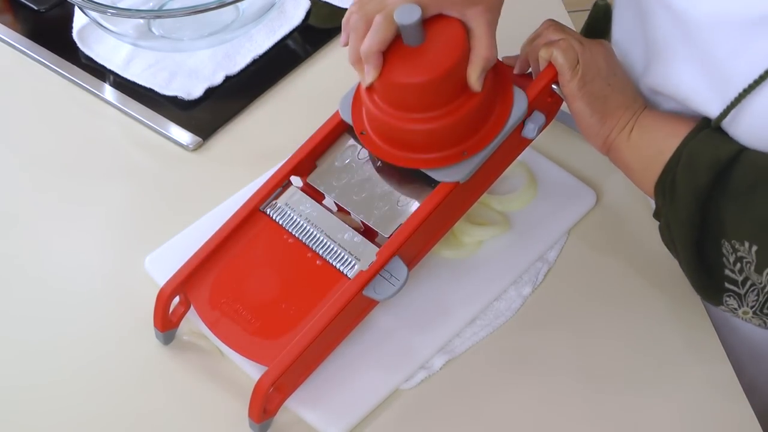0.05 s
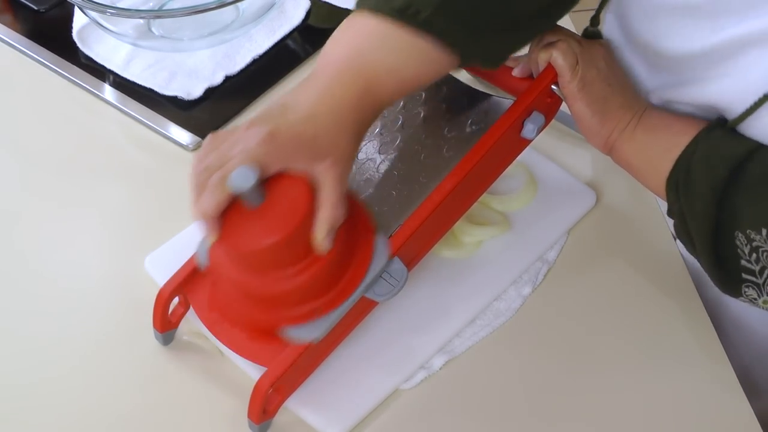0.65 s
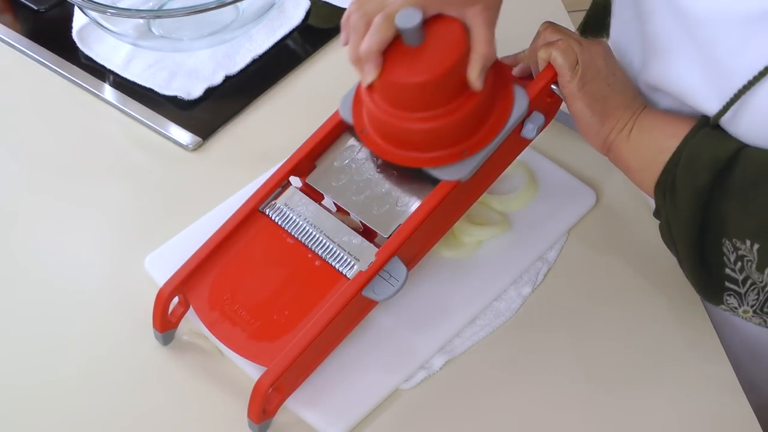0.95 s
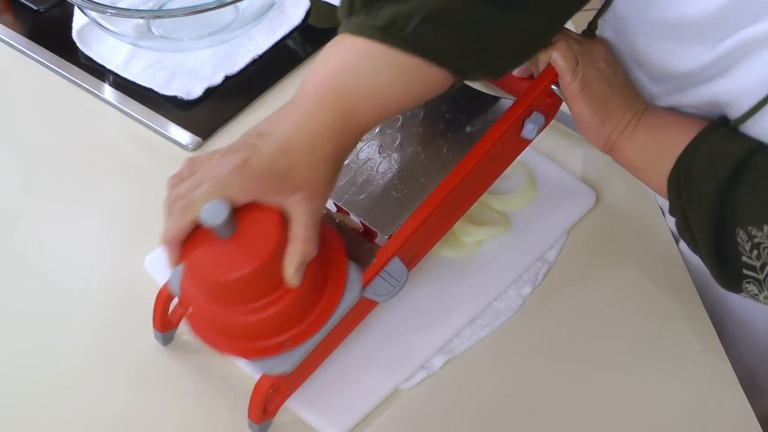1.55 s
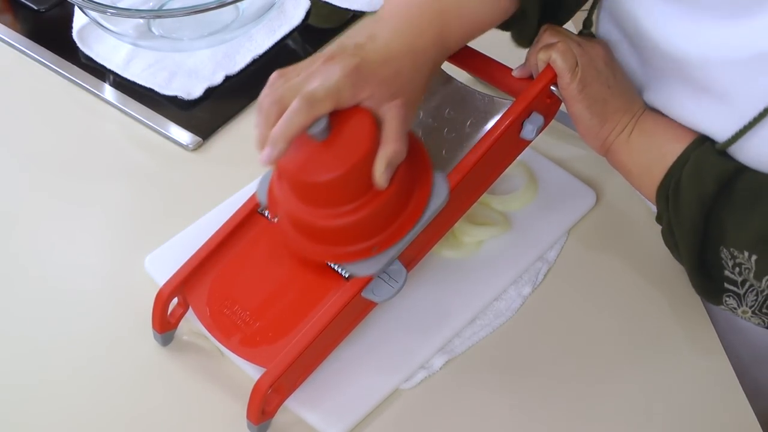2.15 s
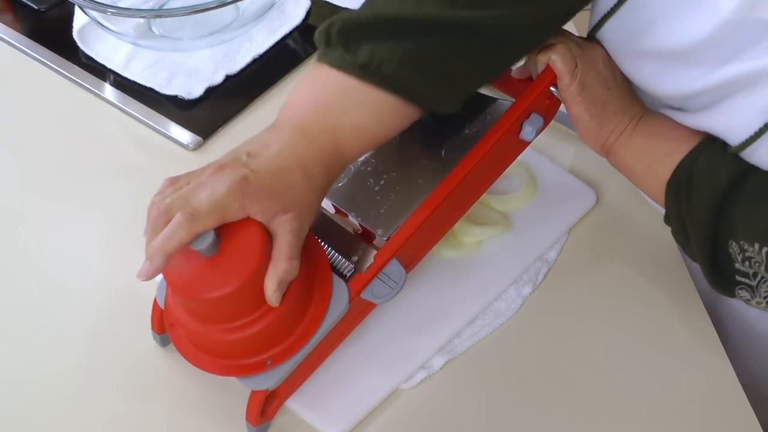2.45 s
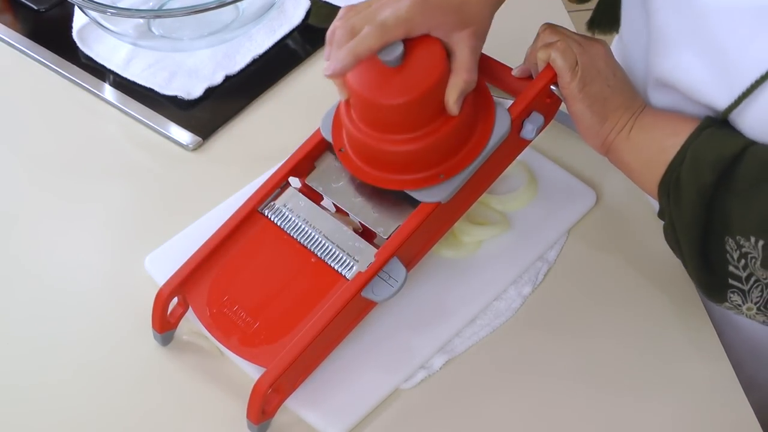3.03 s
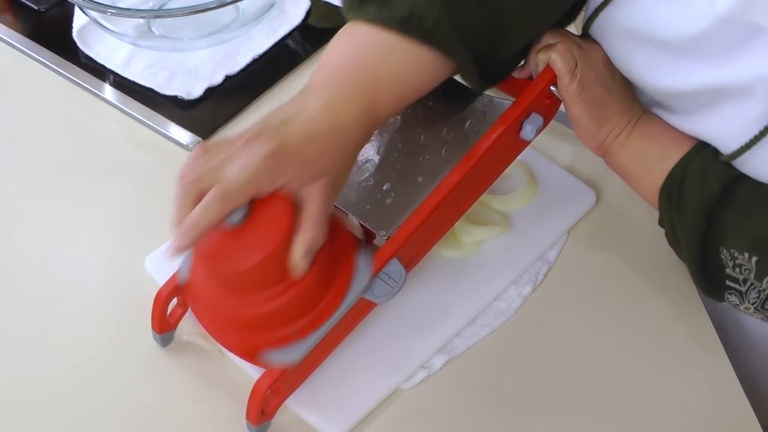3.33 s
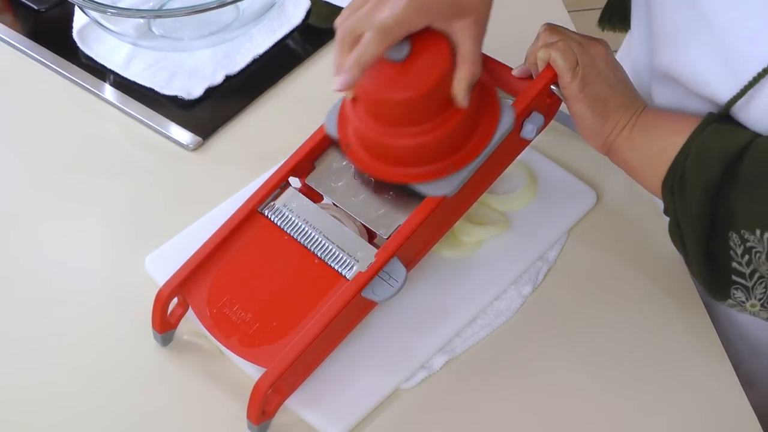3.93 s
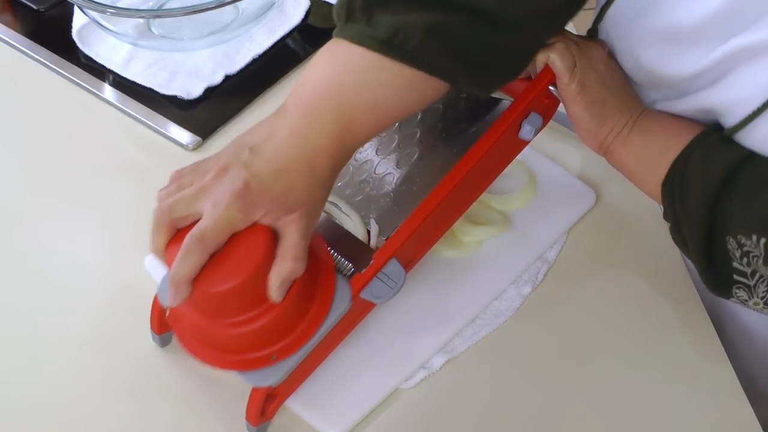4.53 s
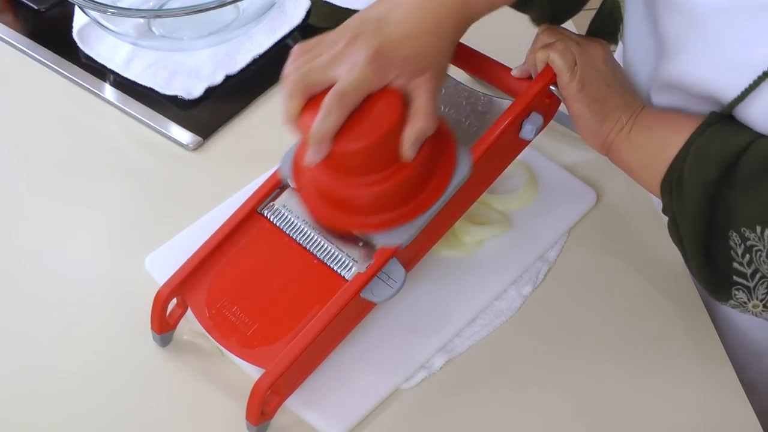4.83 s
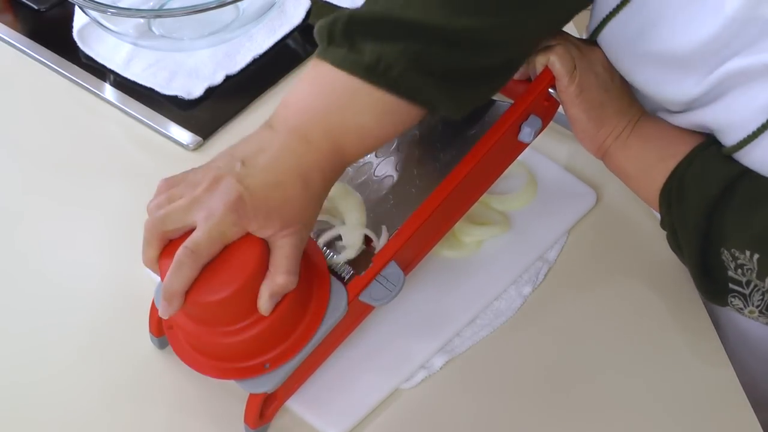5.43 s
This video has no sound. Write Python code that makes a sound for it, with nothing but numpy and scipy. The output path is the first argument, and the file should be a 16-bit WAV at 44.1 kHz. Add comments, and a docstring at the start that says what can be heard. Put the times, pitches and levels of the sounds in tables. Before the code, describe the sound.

Close to the microphone in a quiet kitchen, a plastic food holder slides back and forth on a mandoline, slicing an onion. Six even strokes each bring a wet, slightly squeaky rasp, a crisp crunch at the blades and a hollow plastic knock. Softer scrapes and light taps come between them as the holder is drawn back. The later cuts snap more sharply, over faint room noise.

```python
"""A tap and a rising wet hiss over faint room noise: an onion is pushed down a plastic mandoline.
It squeaks on the ramp, crunches through the blades as its cells burst, and the food holder knocks
against the end stop; drawn back more softly, the holder taps in its rails. Six strokes, close, in mono.
The hollow frame rumbles under the drag and rings with every blow, and the kitchen answers."""
import sys
import numpy as np
from scipy import signal
from scipy.fft import rfft, irfft
from scipy.io import wavfile
from scipy.ndimage import uniform_filter1d

SR = 44100
rng = np.random.default_rng(int(sys.argv[2]) if len(sys.argv) > 2 else 0)


def dump_mix(stems):
    """Bounce the given channels to the path in sys.argv[1] as a 16-bit WAV at rate SR."""
    frames = np.atleast_2d(stems).T  # one column per channel
    limited = np.clip(frames, -1, 1)  # hard clip at full scale
    pcm = np.round(limited * 32767).astype(np.int16)
    wavfile.write(sys.argv[1], SR, pcm)


N = 246078


def gain_of(db):
    """Decibels to amplitude."""
    return 10 ** (np.asarray(db) / 20)


def unit_rms(x):
    """Scale to rms 1."""
    return x / np.sqrt(np.mean(x ** 2) + 1e-20)


def unit_blow(x):
    """Scale the loudest 10 ms to rms 1."""
    return x / np.sqrt(uniform_filter1d(x ** 2, SR // 100).max() + 1e-20)


def lookup(table, hz):
    """Interpolate over log frequency."""
    f, value = np.transpose(table)
    return np.interp(np.log(hz + 1), np.log(f + 1), value)


def add(mix, start_s, sound):
    """Mix in at start_s."""
    part = mix[max(round(start_s * SR), 0):][:len(sound)]
    part += sound[:len(part)]


def coloured(x, spectrum, size=4096):
    """Minimum-phase filter: clicks keep their sharp front."""
    log_gain = np.log(gain_of(lookup(spectrum, abs(np.fft.fftfreq(size, 1 / SR)))))
    taps = np.fft.ifft(np.exp(np.conj(signal.hilbert(log_gain)))).real
    if np.sum(taps[:size // 2] ** 2) < np.sum(taps[size // 2:] ** 2):
        taps = np.roll(taps[::-1], 1)
    return signal.fftconvolve(x, taps[:size // 2])[:len(x)]


def wander(hz):
    """Random drift up to about hz, rms 1."""
    f = np.fft.rfftfreq(N, 1 / SR)
    return unit_rms(irfft(rfft(rng.standard_normal(N)) / (1 + (f / hz) ** 2), N))


def grains(per_s, spread_db):
    """Random clicks of uneven size, rms 1."""
    size = gain_of(spread_db * np.minimum(rng.exponential(1, N), 4))
    return unit_rms(size * rng.choice([-1, 1], N) * (rng.random(N) < per_s / SR))


def ease(u):
    """Smooth step over u = 0..1."""
    return np.sin(np.pi / 2 * np.clip(u, 0, 1)) ** 2


# room noise spectrum: f/Hz, gain/dB
ROOM_SPECTRUM = [(25, 7), (110, -7.5), (280, -15), (600, -19), (1100, -19), (3000, -23.5), (10000, -31),
                 (16000, -67)]

def room_noise(db=-55):
    """Steady, bass-heavy background."""
    return gain_of(db) * unit_rms(coloured(rng.standard_normal(N), ROOM_SPECTRUM))


def push(t, length_s, speed_up_s, blades_s, hiss_db, crunch_db, drag_db):
    """Push envelopes: the onion speeds up, loads the blades, runs out past them and stops dead."""
    sink_s, load_s, run_out_s = 0.05, 0.039, 0.072
    hiss_fall_db_per_s, rattle_fall_db_per_s = 330, 103
    speed = ease(t / speed_up_s)
    grazing = 1 - ease((t - blades_s) / sink_s + .5)
    unloaded = 1 - ease((t - blades_s) / load_s + .5)
    run_out = ease((t - length_s) / run_out_s + 1)
    stopped_s = np.maximum(t - length_s, 0)
    halt_db = -hiss_fall_db_per_s * stopped_s
    return speed * gain_of([hiss_db - 8 * run_out + halt_db,
                            crunch_db - 11.5 * grazing - 4.5 * run_out + halt_db,
                            drag_db - 15.5 * unloaded - rattle_fall_db_per_s * stopped_s])


def pull(t, length_s, hiss_db, drag_db, onset_s=0.013, brake_s=0.2, scrape_db=-12.5):
    """Return envelopes: a light scrape speeds up, loads the rails over the blades and brakes to rest."""
    moving = ease(t / onset_s) * np.clip((length_s - t) / brake_s, 0, 1) ** 1.01
    slow = 1 - np.clip(t / (length_s - brake_s), 0, 1)
    off_blades = 1 - np.exp(-((t / length_s - 0.55) / 0.23) ** 2)
    return (moving * gain_of(hiss_db - 10.5 * slow),
            moving * gain_of(hiss_db + scrape_db),
            moving * gain_of(drag_db - 10.5 * off_blades))


# pushes down the ramp: t/s, speed-up/s, time to blades/s, relative hiss/dB, crunch/dB, drag/dB
PUSHES = [(0.095, 0.15, 0.15, -39, -44, -45.5), (1.029, 0.15, 0.17, -40, -42.5, -42.5),
          (1.96, 0.24, 0.16, -43, -43.5, -43.5), (3.025, 0.15, 0.15, -41, -43, -43.5),
          (4.055, 0.11, 0.15, -38.5, -43.5, -42.5), (5.079, 0.14, 0.19, -39, -41.5, -40.5)]
# returns up the ramp: t/s, length/s, relative hiss/dB, drag/dB
RETURNS = [(0.567, 0.43, -42, -55), (1.53, 0.36, -43, -47.5), (2.557, 0.41, -42.5, -48.5),
           (3.55, 0.45, -43, -54.5), (4.53, 0.51, -42.5, -58), (5.545, 0.45, -40, -50)]

def strokes(stop_times_s, grip_db=-58.5):
    """Hiss, crunch and drag envelopes of all strokes; the hands never hold the frame quite still."""
    t, envelopes = np.arange(SR) / SR, np.zeros((3, N))
    moves = [(s, push(t, stop_s - s, *rest)) for (s, *rest), stop_s in zip(PUSHES, stop_times_s)]
    moves += [(s, pull(t, *rest)) for s, *rest in RETURNS]
    for start_s, move in moves:
        for envelope, part in zip(envelopes, move):
            add(envelope, start_s, part)
    hiss, crunch, drag = envelopes
    return hiss, crunch, drag + gain_of(grip_db)


# frame rumble spectrum: f/Hz, gain/dB
DRAG_SPECTRUM = [(25, -21.5), (70, -2), (105, -5.5), (150, -6.5), (190, -4), (290, -12), (400, -11),
                 (520, -5), (620, -4), (800, -14), (1500, -64), (5000, -34)]

def rail_drag(envelope, gain_db=1.5, judder_db=3.5):
    """The holder judders along its rails and the hollow frame rumbles."""
    slips = grains(per_s=1100, spread_db=-2.0) * gain_of(judder_db * wander(hz=29.8))
    return gain_of(gain_db) * envelope * unit_rms(coloured(slips, DRAG_SPECTRUM))


# wet sliding spectrum: f/Hz, gain/dB
HISS_SPECTRUM = [(300, -64), (1500, -13.5), (2700, -9), (3600, -1.5), (4700, -7.5), (6300, -2), (7300, -3),
                 (8300, 0), (9600, 0), (10500, -1), (13000, -5), (15800, -16.5)]

def ramp_hiss(envelope, flutter_db=1.46, patch_db=2.0):
    """Wet onion fizzes in tiny slips; the contact shifts, so the colour drifts in patches."""
    slips = grains(per_s=8000, spread_db=-3.5) * gain_of(flutter_db * wander(hz=71))
    bins = signal.stft(coloured(slips, HISS_SPECTRUM), SR, nperseg=512)[2]
    patches = uniform_filter1d(rng.standard_normal(bins.shape), size=7, axis=0)
    patches = unit_rms(uniform_filter1d(patches, size=5, axis=1))
    fizz = signal.istft(bins * gain_of(patch_db * patches), SR, nperseg=512)[1][:N]
    return envelope * unit_rms(fizz)


def chatter(t, peak_s):
    """Hard contact: a burst strongest near peak_s, with no deep spectral gaps."""
    bins = rfft(t / peak_s * np.exp(-t / peak_s) * rng.standard_normal(len(t)))
    flattened = irfft(bins / (abs(bins) + abs(bins).mean()), len(t))
    return flattened * np.exp(-(t / (10 * peak_s)) ** 2)


def ring(modes, t, detune):
    """Damped modes, detuned at random as grip and holder position vary."""
    out = np.zeros(len(t))
    for hz, db, t60_s in modes:
        hz *= 1 + detune * rng.standard_normal()
        out += gain_of(db - 60 * t / t60_s) * np.sin(2 * np.pi * hz * t)
    return out


# frame modes: f/Hz, level/dB re the holder's hollow, t60/s
FRAME_MODES = [(430, -4.5, 0.039), (513.8, -15, 0.13), (594, -8, 0.027), (608.7, -14.5, 0.14),
               (655.6, -19.5, 0.12), (1034.5, -20.5, 0.034), (1270, -27.5, 0.056), (1696, -34, 0.11),
               (1995, -27, 0.067), (2710, -57, 0.0079), (3644, -27, 0.054)]
# frame bouncing on feet and board: f/Hz, relative level/dB, t60/s
FEET_MODES = [(34.5, 0, 0.21), (104.7, 4, 0.0857), (173, -6, 0.14)]

def blows(rows, clack_spectrum, crack_spectrum, *, crack_s, clack_s, build_up_s, hollow_t60_s,
          ring_db, clack_db, crack_db, thud_db):
    """Contacts chatter, holder and frame ring, the feet bounce. The dB settings offset the row levels."""
    t, out = np.arange(SR // 3) / SR, np.zeros(N)
    build_up = 1 - np.exp(-(t / build_up_s) ** 2)  # plastic takes a few cycles to swing fully
    for start_s, crack_level, clack_level, ring_level, hollow_hz in rows:
        hollow = ring([(hollow_hz, 0, hollow_t60_s)], t, detune=0)
        clack = coloured(chatter(t, clack_s), clack_spectrum)
        crack = coloured(chatter(t, crack_s), crack_spectrum)
        body = build_up * (hollow + ring(FRAME_MODES, t, detune=0.0098))
        thud = build_up * ring(FEET_MODES, t, detune=0.067)
        thud_level = (crack_level + ring_level) / 2
        add(out, start_s, gain_of(clack_level + clack_db) * unit_blow(clack))
        add(out, start_s, gain_of(crack_level + crack_db) * unit_blow(crack))
        add(out, start_s, gain_of(ring_level + ring_db) * unit_blow(body))
        add(out, start_s, gain_of(thud_level + thud_db) * unit_blow(thud))
    return out


# plastic on plastic, mid clack and bright crack spectra: f/Hz, gain/dB
PLASTIC_CLACK = [(200, -18), (600, 4), (740, 7.5), (870, 1.5), (1040, 5.5), (1170, 5.5), (1290, 1.5),
                 (1550, 1.5), (1720, -2), (1900, -4), (2500, -7), (3700, -8), (7000, -14), (15000, -27.5)]
PLASTIC_CRACK = [(500, 9.5), (2000, -29), (3700, 5), (4600, 0.5), (7000, 0), (9000, 5), (10500, -1.5),
                 (13000, -4), (15800, -27)]
# holder taps: t/s, relative crack/dB, clack/dB, ring/dB, hollow f/Hz
RAIL_TAPS = [(0.1038, -23, -33.5, -33.5, 640), (0.5521, -28.5, -38.5, -37, 525),
             (0.5834, -41, -44, -37, 557), (0.7257, -28, -39.5, -38.5, 570),
             (1.033, -34, -36.5, -34.5, 565), (1.5199, -24, -37, -24.5, 538),
             (1.5601, -30, -29.5, -41, 506), (1.7024, -34, -35.5, -31, 633), (1.7678, -26, -34, -39.5, 655),
             (1.932, -39.5, -53, -55, 680), (1.9615, -52, -40.5, -28.5, 589),
             (2.2391, -26, -33.5, -30.5, 523), (2.5531, -25.5, -39, -31.5, 580),
             (2.7925, -26, -31, -41, 716), (3.043, -35.5, -47.5, -40, 644), (3.5364, -29.5, -42, -35, 556),
             (3.7921, -35, -39, -41, 594), (4.0274, -72, -58, -30, 584), (4.0417, -30, -44, -45, 630),
             (4.5318, -36, -40.5, -30.5, 487), (4.6935, -25, -35.5, -30.5, 588),
             (4.7418, -30, -34, -33, 643), (5.0799, -27, -39.5, -30.5, 585), (5.5428, -24, -33, -30, 570)]

def rail_taps():
    """The holder taps in its rails as it turns round or rides over the blades."""
    return blows(RAIL_TAPS, PLASTIC_CLACK, PLASTIC_CRACK,
                 crack_s=0.0011, clack_s=0.0035, build_up_s=0.0031, hollow_t60_s=0.055,
                 ring_db=-3.0, clack_db=-4.5, crack_db=-12.5, thud_db=-10.0)


# onion squeaks: centre t/s, length/s, f/Hz, level/dB
SQUEAKS = [(0.22, 0.12, 3670, -49.5), (1.163, 0.06, 3730, -45), (3.124, 0.13, 3740, -54),
           (4.157, 0.14, 3660, -45), (4.843, 0.019, 3580, -40), (5.2, 0.12, 3675, -41.5)]

def ramp_squeaks(width_hz=130, waver=0.00676):
    """Brief raspy whistles where the wet face sticks and slips."""
    t, out = np.arange(N) / SR, np.zeros(N)
    rasp = wander(width_hz) + 1j * wander(width_hz)
    drift = 1 + waver * wander(hz=41)
    for centre_s, length_s, hz, db in SQUEAKS:
        swell = np.cos(np.pi * np.clip((t - centre_s) / length_s, -.5, .5))
        whistle = np.exp(2j * np.pi * np.cumsum(hz * drift) / SR)
        out += gain_of(db) * swell * (rasp * whistle).real
    return out


# bursting cell spectrum: f/Hz, gain/dB
CRUNCH_SPECTRUM = [(250, -12.5), (700, -10), (880, 10), (1050, 10.5), (1600, 4.5), (1850, 0), (2100, 7),
                   (2700, -1), (4200, 1), (7000, -3), (15000, -38)]

def cell_crunch(envelope, gain_db=1.0, clump_db=2.5):
    """Cells burst at the blades in small clumps."""
    bursts = grains(per_s=2900, spread_db=1.0) * gain_of(clump_db * wander(hz=90))
    return gain_of(gain_db) * envelope * unit_rms(coloured(bursts, CRUNCH_SPECTRUM))


# breaking onion, mid spectrum: f/Hz, gain/dB
BITE_SPECTRUM = [(200, -90), (700, -1.5), (1100, 6.5), (1400, 5.5), (1800, 3), (2300, 3), (3000, -4.5),
                 (7000, -13.5), (15000, -64)]

def fibre_crackle(envelope, gain_db=-8.0, decay_s=0.0023):
    """Single fibres snap at the blades, each a short noise burst."""
    breaks = abs(grains(per_s=60, spread_db=2.5))
    decays = signal.lfilter([1], [1, -np.exp(-1 / (decay_s * SR))], breaks)
    snaps = coloured(decays * rng.standard_normal(N), BITE_SPECTRUM)
    return gain_of(gain_db) * envelope * unit_rms(snaps)


# breaking onion, bright spectrum: f/Hz, gain/dB
SNAP_SPECTRUM = [(500, -35), (2000, -58), (3700, -2), (5500, 0), (7500, 5), (9000, 9.5), (11000, 0),
                 (13000, 1), (15800, -10)]
# blade bites: t/s, relative crack/dB, clack/dB, ring/dB, hollow f/Hz
BLADE_BITES = [(0.2546, -29, -29, -34, 560), (0.3725, -28, -38, -33, 603), (1.2085, -20, -28, -40, 485),
               (2.141, -15, -32.5, -31.5, 613), (3.1864, -34, -40, -30, 590), (3.273, -0.5, -34, -27, 500),
               (3.319, -19, -36.5, -23, 534), (4.2, -34, -40, -41, 724), (4.2605, -14.5, -38, -19.5, 486),
               (4.314, -18, -39, -21.5, 410), (5.2362, -33, -40.5, -47, 666),
               (5.2781, -30, -38.5, -34, 505), (5.3212, -17.5, -41.5, -25, 463)]

def blade_bites():
    """The blades bite through a layer of onion and jolt the frame."""
    return blows(BLADE_BITES, BITE_SPECTRUM, SNAP_SPECTRUM,
                 crack_s=0.0016, clack_s=0.0034, build_up_s=0.0038, hollow_t60_s=0.078,
                 ring_db=-6.0, clack_db=2.5, crack_db=-16.0, thud_db=-12.0)


# end stop knocks: t/s, relative crack/dB, clack/dB, ring/dB, hollow f/Hz
STOP_KNOCKS = [(0.4417, -20.5, -17, -19, 495.5), (1.4043, -20, -19, -17.5, 503),
               (2.4005, -20.5, -19.5, -15.5, 493), (3.3818, -15, -16, -15, 539),
               (4.3774, -14, -15.5, -17, 492), (5.404, -15, -14.5, -15.5, 525)]

def stop_knocks():
    """The holder hits the end stop after each push."""
    return blows(STOP_KNOCKS, PLASTIC_CLACK, PLASTIC_CRACK,
                 crack_s=0.0016, clack_s=0.0028, build_up_s=0.005, hollow_t60_s=0.043,
                 ring_db=1.5, clack_db=-2.5, crack_db=-6.5, thud_db=-9.0)


# kitchen decay: f/Hz, t60/s
KITCHEN_T60 = [(100, 0.4), (500, 0.57), (1500, 0.46), (4000, 0.49), (9000, 0.24), (16000, 0.21)]

def kitchen_reverb(x, first_s=0.0036, echoes_per_s=4000, early_t60_s=0.14, low_db=-1.5):
    """Early reflections off worktop and cupboards, then a tail whose treble dies first."""
    echoes = rng.choice([-1., 1.], SR) * (rng.random(SR) < echoes_per_s / SR)
    echoes *= np.arange(SR) > first_s * SR
    hz, t, bins = signal.stft(echoes, SR, nperseg=256)
    early = gain_of(-60 * t / early_t60_s) * (hz > 800)[:, None]  # small surfaces return only short waves
    tail = gain_of(-60 * t / lookup(KITCHEN_T60, hz)[:, None])
    bins *= early + tail
    norm = np.linalg.norm(signal.istft(bins, SR, nperseg=256)[1])
    shelf = gain_of(lookup([(550, low_db), (1200, 0)], hz))[:, None]
    response = signal.istft(bins * shelf, SR, nperseg=256)[1] / norm
    return signal.fftconvolve(x, response)[:N]


def scene(reverb_db=-9.5):
    """Strokes, blows and the quiet kitchen, alike in both channels."""
    hiss, crunch, drag = strokes([knock[0] for knock in STOP_KNOCKS])
    near = ramp_hiss(hiss) + cell_crunch(crunch) + fibre_crackle(crunch) + rail_drag(drag)
    near += ramp_squeaks() + stop_knocks() + rail_taps() + blade_bites()
    mono = near + room_noise() + gain_of(reverb_db) * kitchen_reverb(near)
    return np.array([mono, mono])


def record(dry):
    """Low-pass at 16.1 kHz."""
    low_pass = signal.firwin(301, 16100, window=("kaiser", 8), fs=SR)
    return signal.oaconvolve(dry, low_pass[None], "same")


dry = scene()
out = record(dry)
dump_mix(out)
```